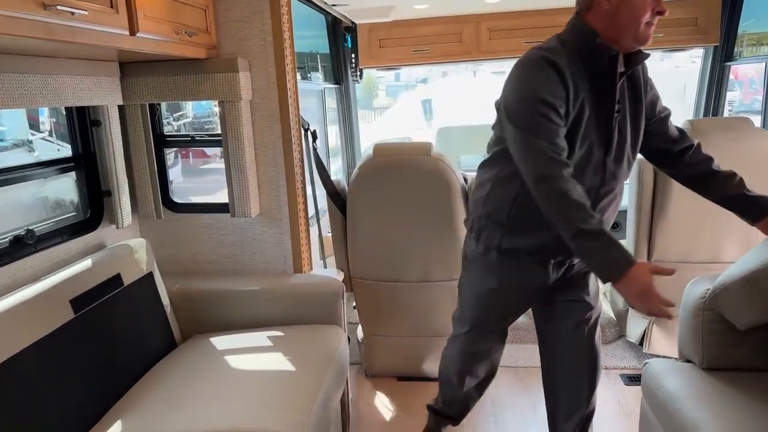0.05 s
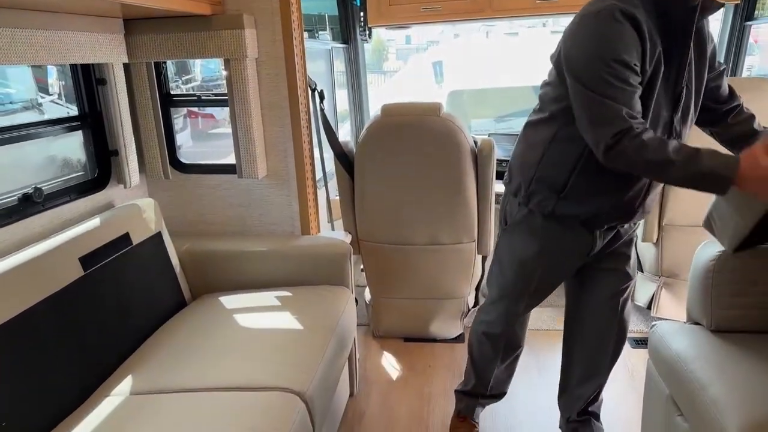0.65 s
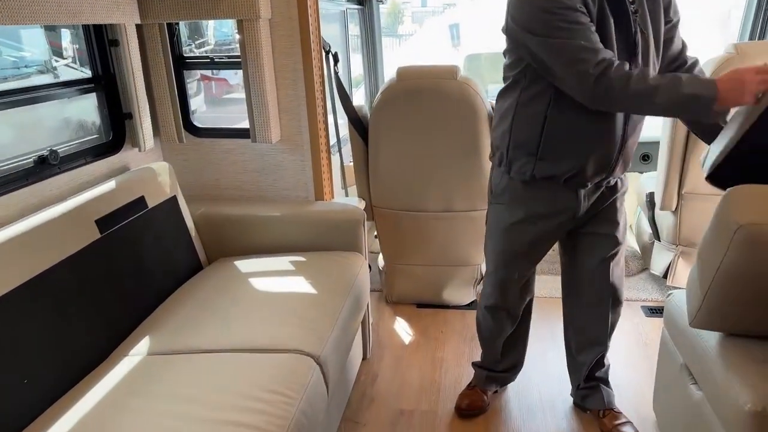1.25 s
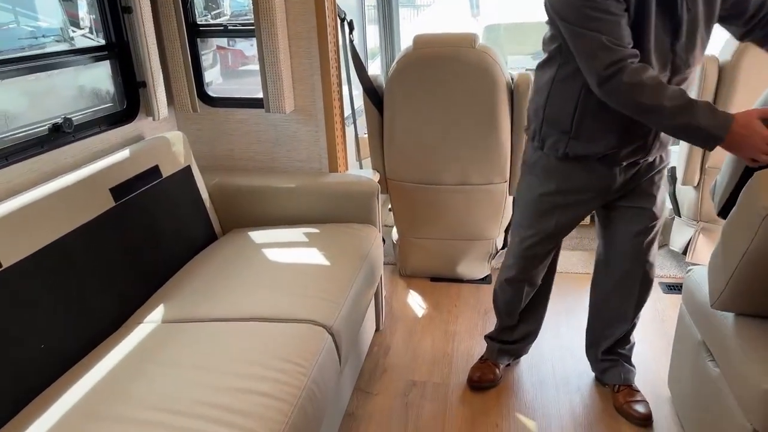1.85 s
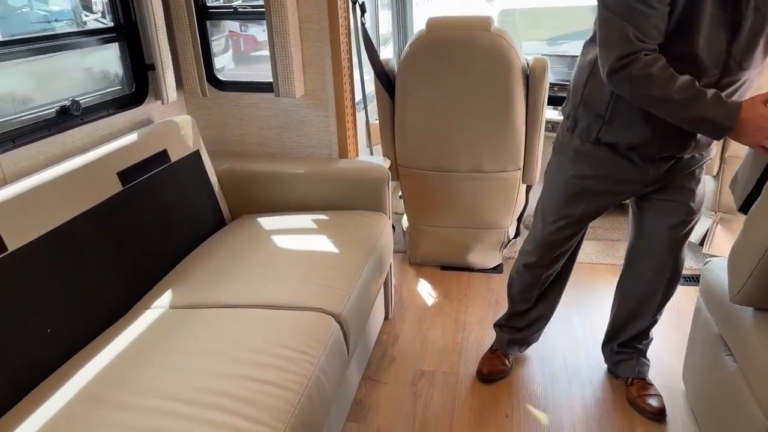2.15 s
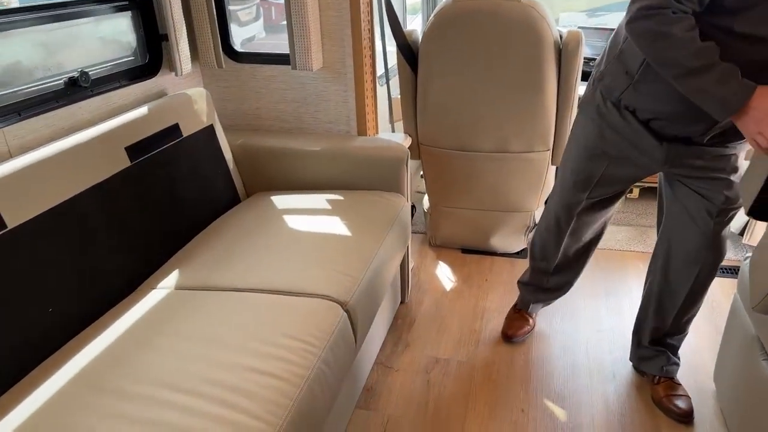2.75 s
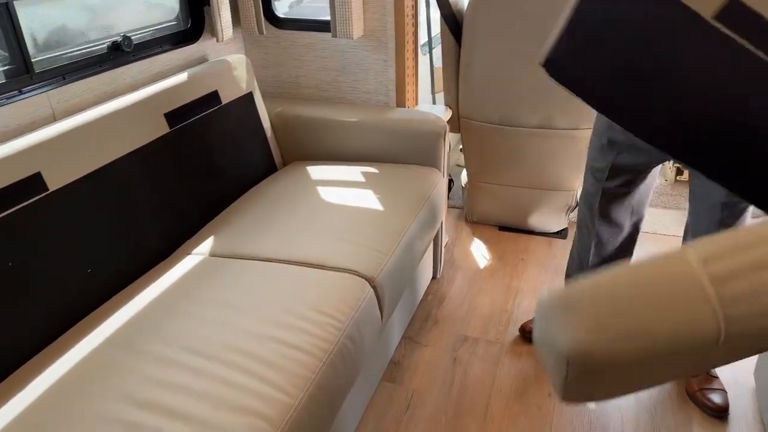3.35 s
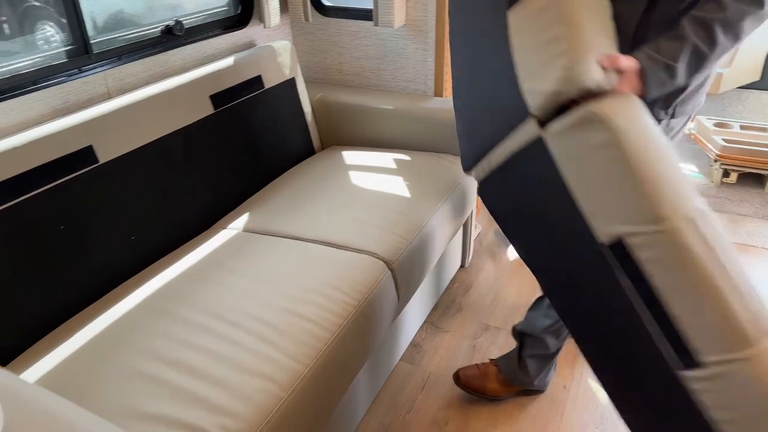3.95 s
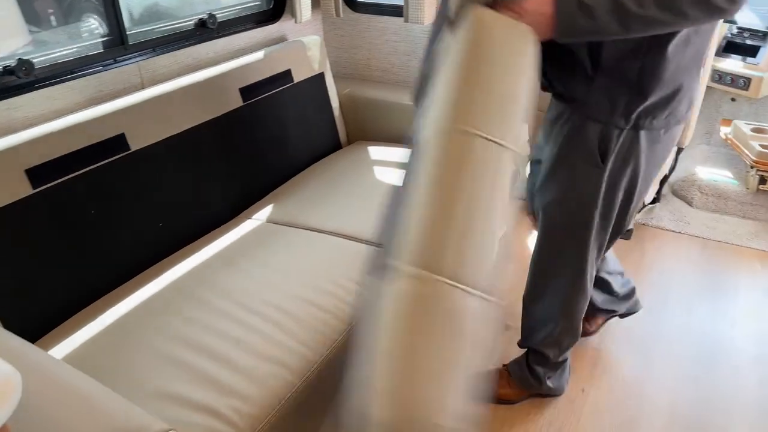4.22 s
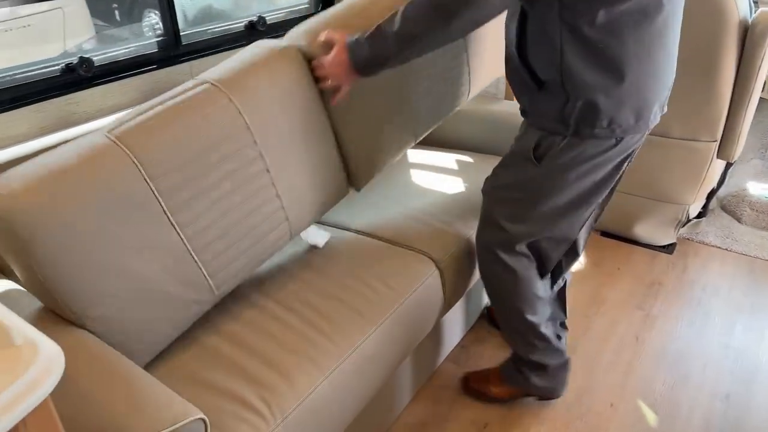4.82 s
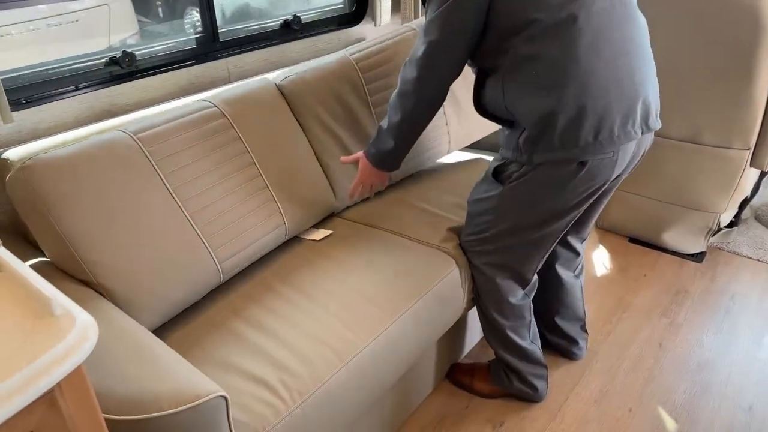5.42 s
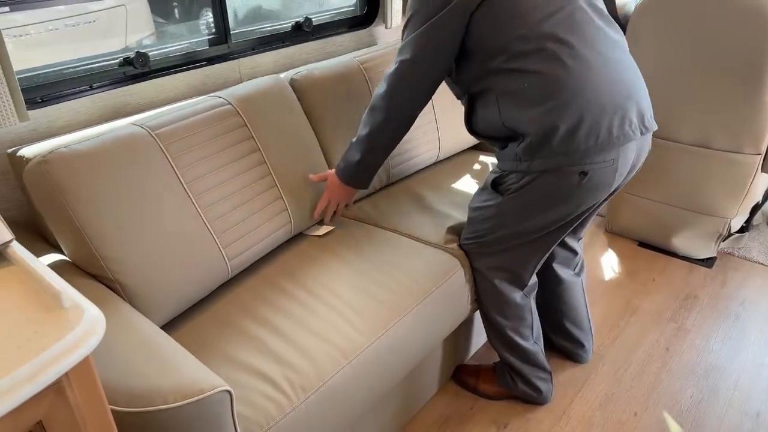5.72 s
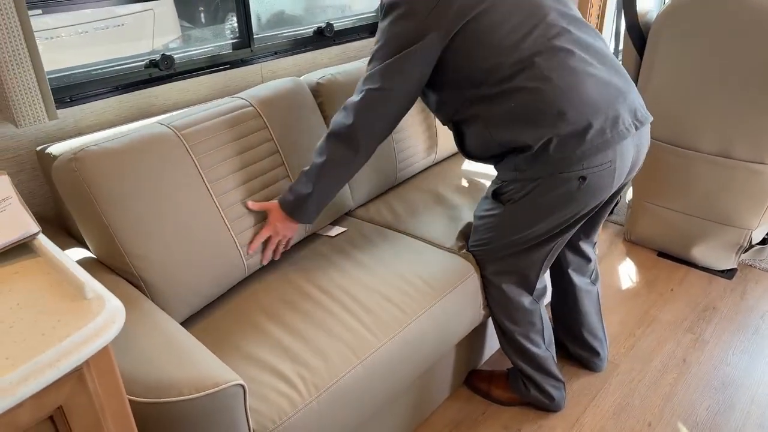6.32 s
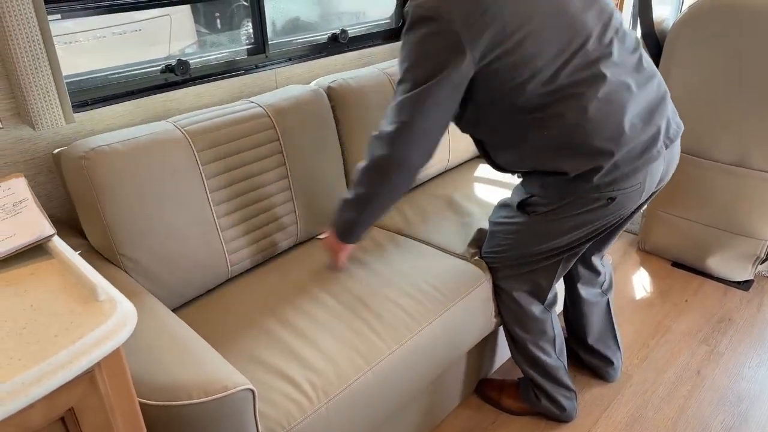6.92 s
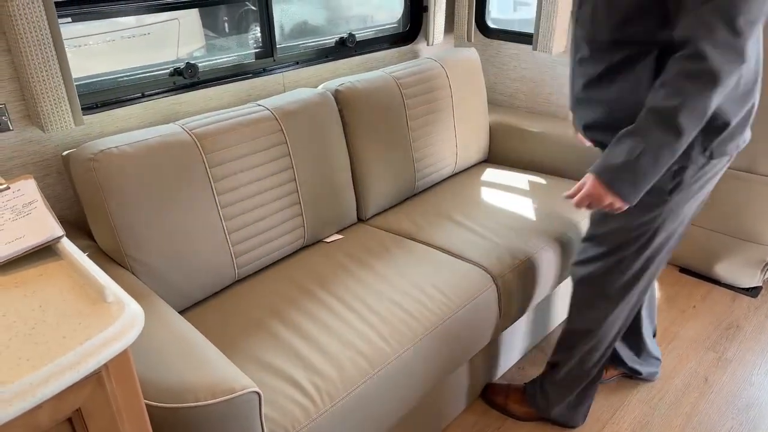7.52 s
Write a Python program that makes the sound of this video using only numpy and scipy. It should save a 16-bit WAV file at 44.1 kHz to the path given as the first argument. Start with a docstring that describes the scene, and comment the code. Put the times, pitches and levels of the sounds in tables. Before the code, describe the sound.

Inside a small padded motorhome cabin, vinyl cushions and clothes slide and rustle, with faint rasps where the covers grip. Shoes and cushion edges knock irregularly on the hollow floor and furniture. Late on, a cushion lands on the sofa with a dull thump, then a much louder, deeper one follows. A few rubs and light knocks trail off. The sound is close and mono, over a faint low rush of air.

```python
"""In a motorhome, a man carries two vinyl back cushions, drops them on the sofa and pats them into place.
Covers and clothes slide in dense tiny slips, rasping where a cover grips; the foam rumbles under them.
Shoes and cushion edges knock on the hollow floor and furniture. Each hard push squeezes out one pulse
of air. The small padded cabin answers faintly, over steady air noise. Both ears hear the same."""
import sys
import numpy as np
from scipy import signal
from scipy.fft import rfft, irfft, next_fast_len
from scipy.io import wavfile
from scipy.ndimage import map_coordinates

SR = 44100
rng = np.random.default_rng(int(sys.argv[2]) if len(sys.argv) > 2 else 0)


def wrap_up_sound(samples):
    """Save the sound to the file named by the first command line argument, as 16-bit audio."""
    columns = np.atleast_2d(samples).T
    # keep every value between -1 and 1, then stretch to whole-number steps
    tamed = np.clip(columns, -1, 1)
    steps = np.round(tamed * 32767).astype(np.int16)
    wavfile.write(sys.argv[1], SR, steps)


N = 338247
TIME = np.arange(N) / SR


# rubbing spectra: (frequency [Hz], density [dB])
VINYL_SPECTRUM = [(1200, -22), (2400, -3.5), (3200, -2), (4000, 1.5), (5400, 2.5), (7500, -2.5),
                  (10000, -7.5), (15000, -29)]
SHEEN_SPECTRUM = [(5000, -20.5), (8000, -8.5), (10500, -3), (12500, -3.5), (14000, -6), (16000, -13)]
CLOTH_SPECTRUM = [(300, -16), (600, 3.5), (900, -3), (1300, 0.5), (1900, -1.5), (2500, -1.5), (3500, -5),
                  (7000, -35.5)]
FOAM_SPECTRUM = [(25, -32), (50, -11), (90, 5), (150, -1.5), (240, -1.5), (360, -2), (550, -8.5),
                 (800, -13.5), (1600, -44)]
# cover on cover, hand or sleeve: (start [s], attack [s], hold [s], 20 dB fall [s], vinyl hiss [dB],
# sheen [dB re hiss], cloth [dB re hiss], foam [dB re hiss])
STROKES = [ (-.012, 0.014, 0.066, 0.66, -69, -5.5, 3.5, 5.5), (.46, 0.12, .3, .48, -66.5, -4.5, 2.5, 0.5),
           (.843, 0.078, 0.26, 0.13, -53.5, -2, -0.5, 6.5), (.977, 0.036, .002, 0.33, -53, 2, -.5, 1),
           (1.083, 0.15, .011, .24, -49, -6, -1.5, 1), (1.296, 0.035, 0.14, 0.69, -68.5, 0, 2, 6.5),
           (1.755, 0.028, 0.0045, .07, -69, -1.5, -2, 11), (1.874, 0.015, .005, 0.19, -71, 2, 10.5, 1),
           (1.919, .132, .062, .24, -58.5, -7, -5.5, -6), (2.094, .031, .018, .23, -49, -5, -5.5, -1.5),
           (2.233, .047, .021, 0.13, -56.5, -5, -1, 1.5), (2.322, 0.084, .116, .52, -70.5, 1.5, -0.5, 2),
           (2.446, 0.31, .092, .18, -61, -4.5, 1, 5), (2.845, 0.015, 0.12, 0.25, -53.5, -3, -4, 4),
           (2.885, .101, 0.17, 0.67, -51.5, 3, -.5, 8), (3.11, .035, .01, .15, -61, 12.5, -12, -3),
           (3.138, 0.18, 0.24, 0.13, -57.5, -8, 4, 11), (3.534, .082, .081, 0.094, -63, 5.5, 4, 5),
           (3.799, 0.088, 0.035, 0.39, -58, 1.5, 2, 9.5), (3.954, 0.096, .138, 0.095, -57.5, 3, 1, 3.5),
           (4.319, .008, .075, 0.083, -55.5, -2, 0, 9), (4.4, 0.069, 0.097, .36, -58.5, -3.5, 3.5, 7),
           (4.786, 0.026, .034, .13, -60.5, -9, -3, 4.5), (4.842, 0.03, .002, 0.36, -52.5, -5.5, -3, 0),
           (5.075, 0.017, 0.11, 0.29, -58, -10, 4.5, 9), (5.169, .258, .13, 0.16, -60.5, -4.5, 0, -20),
           (5.565, .05, .055, 0.21, -54.5, -9.5, 0, 3.5), (5.689, 0.063, 0.013, .05, -56, -1, -3, 1.5),
           (5.846, .015, .004, .22, -63.5, -0.5, -10, -9), (5.962, .048, 0.039, .05, -42.5, -5, -7.5, -4.5),
           (6.02, 0.032, .005, 0.025, -43.5, 6, -13, -1), (6.0, 0.037, 0.068, 0.3, -54, -10, 4, 5.5),
           (6.36, 0.1, .02, .1, -58.5, -9, 1, -1), (6.466, 0.031, 0.028, 0.093, -43.5, -6, -2.5, -3.5),
           (6.567, 0.023, 0.016, 0.14, -50, -15, -0.5, 2), (6.657, 0.054, .061, 0.33, -64.5, -6.5, 1, -2),
           (6.8, 0.29, 0.31, 0.38, -75.5, -4.5, 7, 7), (7.509, 0.076, .056, .31, -75, -19, 1, -2)]

def rubbing(drag_exponent=0.72):
    """Vinyl hisses with a high sheen, clothes rustle, foam passes the slow slips; strokes add in power."""
    power = np.zeros((4, N))
    for start_s, attack_s, hold_s, fall_s, hiss_db, sheen_db, cloth_db, foam_db in STROKES:
        speed = stroke_speed(start_s, attack_s, hold_s, fall_s)
        drag = speed ** drag_exponent  # rustle and rumble outlast the hiss
        gains = np.array([speed, speed * undb(sheen_db), drag * undb(cloth_db), drag * undb(foam_db)])
        power += (undb(hiss_db) * gains) ** 2
    vinyl = slips(VINYL_SPECTRUM, rate_hz=7000, spread_db=2, smooth=0.9, flutter_db=0.9)
    sheen = slips(SHEEN_SPECTRUM, rate_hz=7000, spread_db=2, smooth=0.9, flutter_db=0.9)
    cloth = slips(CLOTH_SPECTRUM, rate_hz=2500, spread_db=-1, smooth=1, flutter_db=0.8)
    foam = slips(FOAM_SPECTRUM, rate_hz=700, spread_db=1, smooth=0.88, flutter_db=3)
    return np.sum(np.sqrt(power) * np.array([vinyl, sheen, cloth, foam]), axis=0)


def stroke_speed(start_s, attack_s, hold_s, fall_s):
    """A stroke gathers pace, holds, then drops 20 dB per fall_s."""
    t = TIME - start_s
    rise = np.clip(t / attack_s, 0, 1) ** 2
    return rise * undb(-20 * np.maximum(t - attack_s - hold_s, 0) / fall_s)


def slips(spectrum, rate_hz, spread_db, smooth, flutter_db):
    """Stick-slip: tiny uneven releases over a smooth rub, in flurries; rms 1."""
    releases = (rng.random(N) < rate_hz / SR) * rng.standard_normal(N)
    sizes = undb(spread_db * np.clip(rng.standard_normal(N), -2, 2))
    friction = unit(releases * sizes) + smooth * rng.standard_normal(N)
    flurries = undb(flutter_db * wander(rate_hz=70))
    return unit(colour(friction * flurries, spectrum))


# cushions pushed home, and a hand's first press on one: (time [s], level [dB], pulse pitch [Hz])
THUMPS = [(5.16, -24, 86), (6.0553, -25, 94), (6.063, -7.5, 115.6)]
# sofa frame: (frequency [Hz], gain [dB], t60 [s])
FRAME_MODES = [(52, -13, 0.27), (90.5, -9.5, 0.1), (131.6, -9, 0.088), (209, -17.5, 0.083),
               (379, -1.5, 0.097)]

def thumps():
    """A cushion meets the sofa back, or a hand first presses one: trapped air leaves in one pulse and the frame
    shudders."""
    out, t = np.zeros(N), TIME[:SR // 2]
    for time_s, level_db, hz in THUMPS:
        lead_s = 1 / hz
        phase = 2 * np.pi * hz * (t - lead_s)
        air_pulse = -phase * np.exp((1 - phase ** 2) / 2)  # overpressure, then underpressure
        add(out, time_s - lead_s, undb(level_db) * ring(air_pulse, FRAME_MODES))
    return out


# shoes and cushion edges: (time [s], level [dB], pitch [Hz], tick level [dB])
KNOCKS = [(0.091, -47, 115, -77), (1.028, -30, 232, -41), (1.126, -27, 291, -45), (1.135, -31.5, 137, -44),
          (1.168, -49, 403, -37.5), (1.208, -30.5, 173, -44), (1.404, -38.5, 378, -59),
          (1.584, -45, 312, -67), (1.610, -45.5, 175, -59), (1.647, -46.5, 336, -49),
          (2.134, -41.5, 130, -53), (2.995, -30, 280, -38.5), (3.09, -37.5, 130, -62),
          (3.185, -40, 148, -60), (3.314, -33.5, 328, -54), (3.4665, -22, 356, -30), (3.478, -40, 330, -37),
          (3.573, -37, 270, -56), (3.840, -33.5, 243, -43), (3.859, -30.5, 245, -42),
          (4.1243, -33.5, 310, -39.5), (4.324, -31.5, 274, -60), (4.381, -37, 130, -49),
          (4.395, -29, 348, -40.5), (4.647, -36, 336, -53), (5.084, -31.5, 330, -39),
          (5.164, -29, 235, -38), (5.183, -31, 128, -56), (5.359, -44.5, 177, -64), (5.612, -45, 131, -51),
          (6.074, -24.5, 265, -39), (6.530, -34.5, 130, -58), (6.713, -46, 120, -66),
          (7.227, -43.5, 402, -58), (7.507, -55.5, 110, -71)]
# hollow floor and furniture: (frequency [Hz], gain [dB], t60 [s])
FLOOR_MODES = [(95, -35, 0.062), (121, -20, 0.1), (201, -17.5, 0.059), (360, -21, 0.014), (566, -14, 0.027)]
# hard contact: (frequency [Hz], density [dB])
TICK_SPECTRUM = [(250, 2), (600, 4), (1300, 3.5), (2000, -4.5), (3000, -14), (5000, -29), (14000, -47)]

def knocks(t60_cycles=10, crack_db=-1, crack_t60_s=0.0071, chatter_db=-6, chatter_t60_s=0.057):
    """A struck spot swings briefly, shaking floor and furniture; a hard edge cracks, then chatters."""
    out, t = np.zeros(N), TIME[:SR // 4]
    contact = undb(crack_db) * fade(t, crack_t60_s) + undb(chatter_db) * fade(t, chatter_t60_s)
    for time_s, level_db, hz, tick_db in KNOCKS:
        strike = np.sin(2 * np.pi * hz * t) * fade(t, t60_cycles / hz)
        tick = noise(len(t), TICK_SPECTRUM) * contact
        add(out, time_s, undb(level_db) * ring(strike, FLOOR_MODES) + undb(tick_db) * tick)
    return out


# heels on the floor: (time [s], level [dB], start pitch [Hz], length [s])
HEELS = [(2.295, -49, 477, 0.022), (3.956, -27.5, 380, 0.023), (4.544, -31.5, 325, 0.018)]

def heels(end_hz=62, tick_db=-11):
    """Bending waves cross the floor panel, highs fastest, so each footfall drops in pitch."""
    out = np.zeros(N)
    for time_s, level_db, start_hz, length_s in HEELS:
        t = TIME[:int(length_s * SR)]
        hz = start_hz * (end_hz / start_hz) ** (t / length_s)
        wave = np.sin(2 * np.pi * np.cumsum(hz) / SR) * np.sqrt(1 - (t / length_s) ** 6)
        tick = noise(len(t), TICK_SPECTRUM) * fade(t, length_s)
        add(out, time_s, undb(level_db) * (wave + undb(tick_db) * tick))
    return out


# covers catching and slapping: (time [s], level [dB], t60 [s])
SCUFFS = [(0.506, -62.5, 0.28), (1.885, -59, .15), (4.324, -50.5, 0.3), (5.153, -39, 0.15),
          (6.054, -32, 0.14)]
# scuffing cover: (frequency [Hz], density [dB])
SCUFF_SPECTRUM = [(300, 15.5), (900, 11.5), (2000, 7), (4000, 3), (7000, 2.5), (12000, -5), (16000, -36)]

def scuffs():
    """A cover lands or breaks loose at once, then slides to rest."""
    speed = np.zeros(N)
    for time_s, level_db, t60_s in SCUFFS:
        add(speed, time_s, undb(level_db) * fade(TIME[:SR // 2], t60_s))
    return speed * slips(SCUFF_SPECTRUM, rate_hz=6000, spread_db=2, smooth=0.9, flutter_db=1.2)


# gripping strokes: (start [s], end [s], start pitch [Hz], end pitch [Hz], level [dB])
RASPS = [(.93, 1.114, 480, 599, -50.5), (1, 1.349, 620, 450, -56.5), (1.189, 1.3, 5320, 5400, -53),
         (1.884, 1.93, 1860, 1870, -60), (2.93, 3.632, 2660, 2777, -56.5), (3.1, 3.68, 1100, 1263, -59),
         (3.496, 3.647, 4800, 4870, -60.5), (4.434, 4.517, 755, 977, -59.5), (6.14, 6.384, 3000, 2740, -68),
         (6.483, 6.599, 2470, 2360, -58)]

def rasps(width_ratio=0.07):
    """A gripping cover slips nearly in step; uneven slips widen the gliding pitch into a band."""
    out = np.zeros(N)
    for start_s, end_s, start_hz, end_hz, level_db in RASPS:
        progress = np.linspace(0, 1, int((end_s - start_s) * SR))
        phase = 2 * np.pi * np.cumsum(start_hz + (end_hz - start_hz) * progress) / SR
        lowpass = signal.butter(2, width_ratio * start_hz, fs=SR, output="sos")
        uneven = signal.sosfilt(lowpass, rng.standard_normal((2, SR)))[:, -len(progress):]
        rasp = unit(uneven[0] * np.cos(phase) + uneven[1] * np.sin(phase))
        add(out, start_s, undb(level_db) * rasp * np.cbrt(np.sin(np.pi * progress)))
    return out


def panel_echoes(x, echo_db, drift_s, lags_s=(0.0009, 0.0021, 0.0047)):
    """Nearby panels return the rub; the paths drift as the cushions move, shifting its colour."""
    out = x
    for lag_s in lags_s:
        source_s = TIME - lag_s - drift_s * wander(rate_hz=1)
        out = out + undb(echo_db) * map_coordinates(x, [source_s * SR], order=3)
    return out / np.sqrt(1 + len(lags_s) * undb(echo_db) ** 2)


def cabin_reverb(x, wet_db, t60_s):
    """Close padded walls return a faint, dull tail."""
    t = TIME[:SR // 2]
    tail = noise(len(t), [(40, 14), (150, -2), (1500, 5.5), (5000, 1), (15000, -33)])
    onset = np.clip(t / 0.013 - 0.5, 0, 1)
    tail *= onset * fade(t, t60_s)
    tail /= np.sqrt(np.sum(tail ** 2))
    return x + undb(wet_db) * signal.fftconvolve(x, tail)[:N]


# cabin air: (frequency [Hz], density [dB])
AIR_SPECTRUM = [(25, -20), (60, -2.5), (100, 5), (150, -4), (300, -6.5), (700, -13), (2000, -23.5),
                (6000, -30), (15000, -43.5)]

def cabin_air(level_db=-64):
    """Steady, low rush of air."""
    return undb(level_db) * noise(N, AIR_SPECTRUM)


def ring(push, modes):
    """A push heard directly and through the modes it excites; peak 1."""
    t = np.arange(len(push)) / SR
    response = sum(undb(gain_db) * 2 * np.pi * hz / SR * np.cos(2 * np.pi * hz * t) * fade(t, t60_s)
                   for hz, gain_db, t60_s in modes)
    y = push + signal.fftconvolve(push, response)[:len(push)]
    return y / np.abs(y).max()


def colour(x, spectrum):
    """Minimum-phase filter through (frequency [Hz], gain [dB]) points."""
    size = next_fast_len(len(x) + 4096, real=True) // 2 * 2
    hz, db = np.transpose(spectrum)
    bins_hz = np.maximum(np.fft.rfftfreq(size, 1 / SR), 1)
    gain_db = np.interp(np.log(bins_hz), np.log(hz), db)
    cepstrum = irfft(np.log(undb(gain_db)))
    cepstrum[1:size // 2] *= 2
    cepstrum[size // 2 + 1:] = 0
    return irfft(rfft(x, size) * np.exp(rfft(cepstrum)))[:len(x)]


def noise(samples, spectrum):
    """Coloured noise, rms 1."""
    return unit(colour(rng.standard_normal(samples), spectrum))


def wander(rate_hz):
    """Random drift, spread near 1."""
    knots = rng.standard_normal(2048)
    return np.interp(TIME * rate_hz, np.arange(len(knots)), knots)


def undb(db):
    return 10 ** (np.asarray(db) / 20)


def unit(x):
    """Scale to rms 1."""
    return x / np.sqrt(np.mean(x ** 2))


def fade(t, t60_s):
    """Exponential decay, 60 dB in t60_s."""
    return np.exp(-np.log(1000) * t / t60_s)


def add(out, start_s, x):
    """Mix x into out from start_s."""
    i = max(int(start_s * SR), 0)
    out[i:i + len(x)] += x[:N - i]


def scene():
    """Rubbing and blows in the cabin, over its steady air."""
    rubs = panel_echoes(rubbing() + scuffs(), echo_db=-21, drift_s=0.000207)
    blows = cabin_reverb(knocks() + heels(), wet_db=-15, t60_s=0.31)
    pushes = cabin_reverb(thumps(), wet_db=-28, t60_s=0.74)
    mono = rubs + blows + pushes + cabin_air() + rasps()
    return np.array([mono, mono])


def record(dry, low_cut_hz=33, high_cut_hz=15850):
    """Thin the deepest bass and cut the top."""
    highpass = signal.butter(4, low_cut_hz, "high", fs=SR, output="sos")
    lowpass = signal.ellip(12, 0.2, 80, high_cut_hz, fs=SR, output="sos")
    thinned = signal.sosfiltfilt(highpass, dry, padtype="even")
    return signal.sosfilt(lowpass, thinned)


dry = scene()
out = record(dry)
wrap_up_sound(out)
```